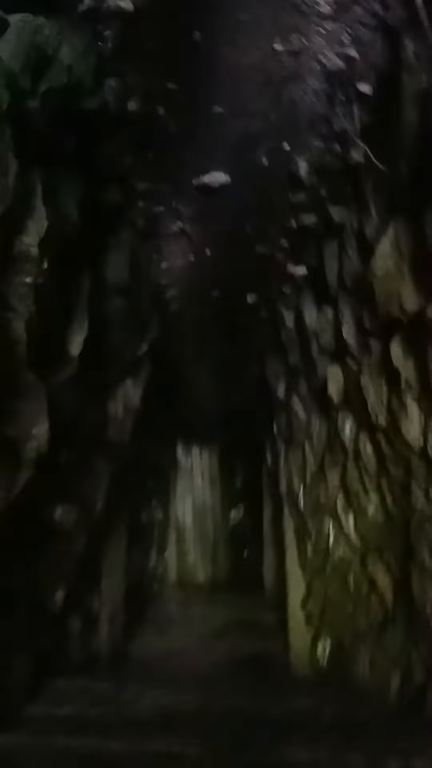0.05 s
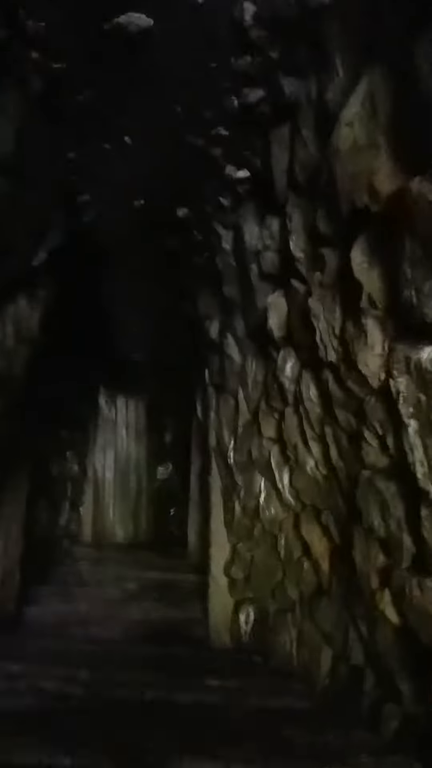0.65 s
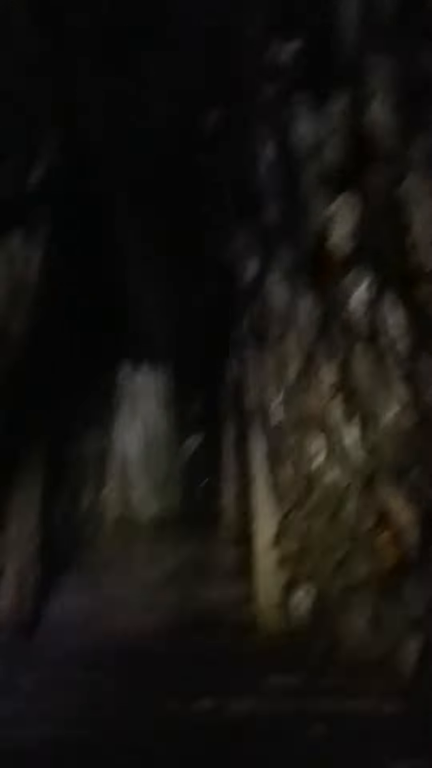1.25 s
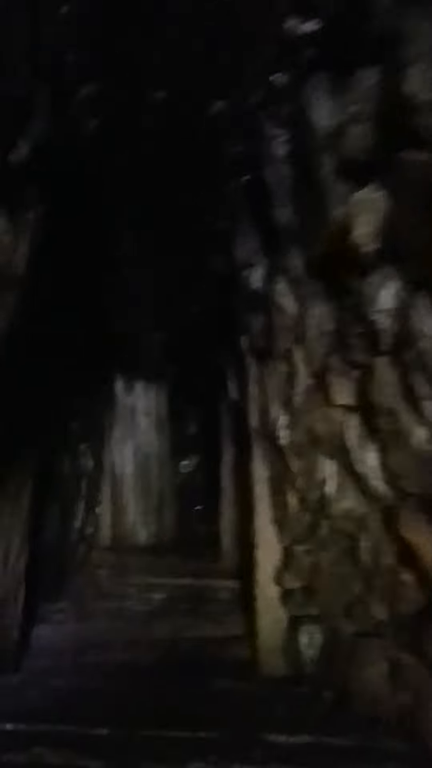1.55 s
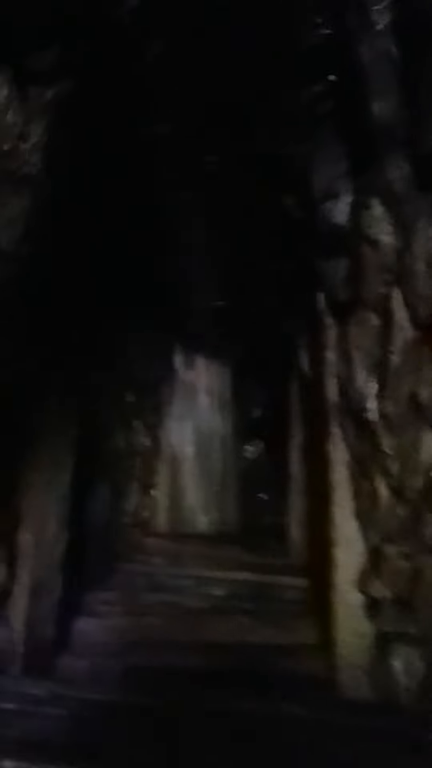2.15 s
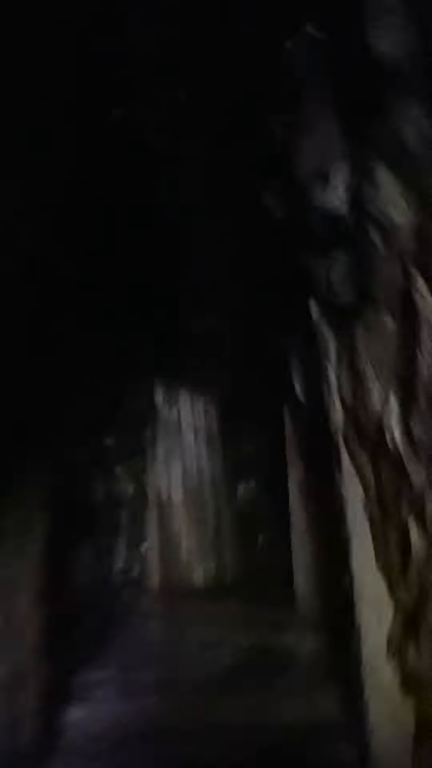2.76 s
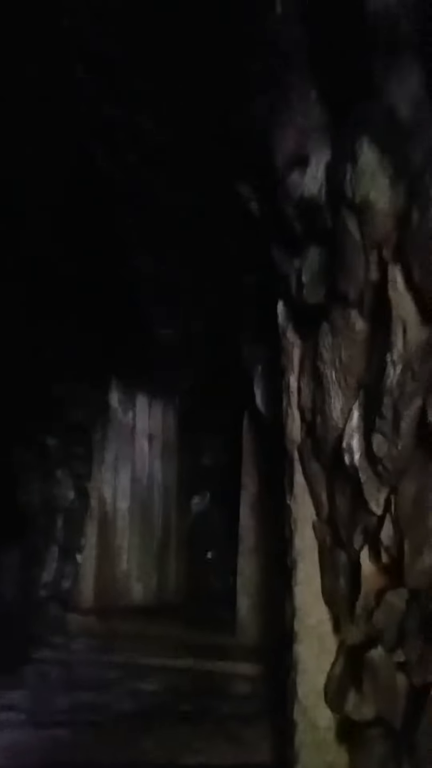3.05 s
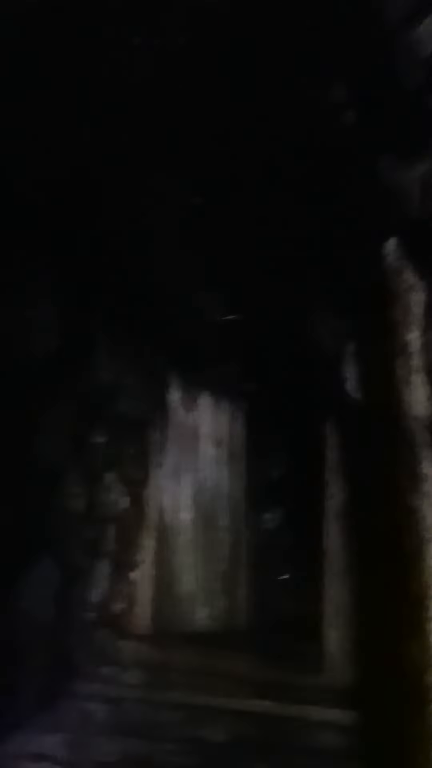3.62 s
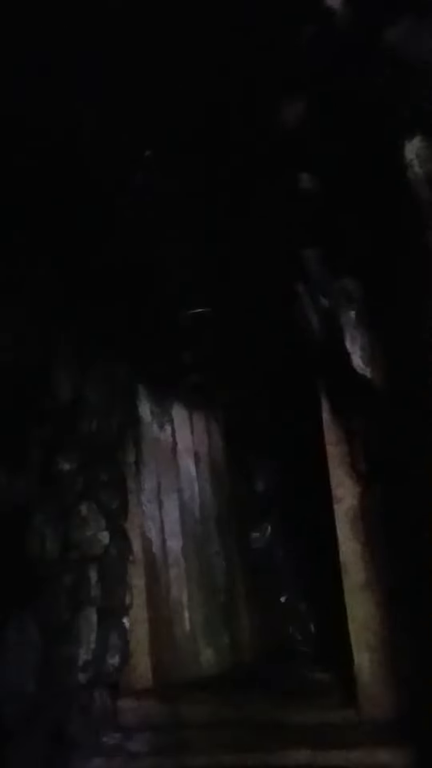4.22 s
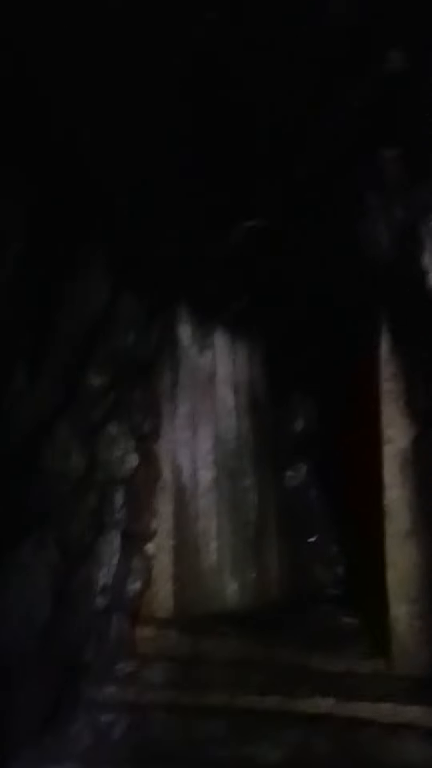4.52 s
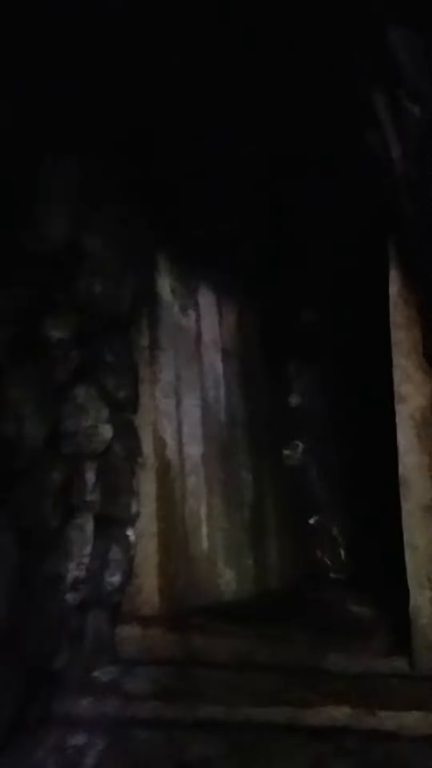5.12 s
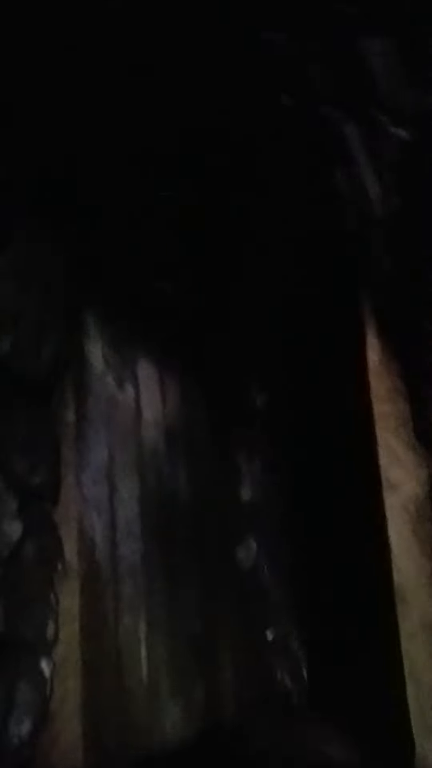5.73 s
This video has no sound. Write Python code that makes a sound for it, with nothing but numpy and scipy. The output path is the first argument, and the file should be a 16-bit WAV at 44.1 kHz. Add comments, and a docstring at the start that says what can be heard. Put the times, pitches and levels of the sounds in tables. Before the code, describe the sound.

Eight slow footsteps move through a narrow, wet rock tunnel, heard close from a stereo microphone in the walker's hand. Heels land at about 0.3, 1.1, 1.7, 2.4, 3.1, 3.8, 4.5 and 5.2 seconds. Each gives a dull thud, then the sole rubs over grit and slaps into shallow water with a fine spatter. The sharpest slaps come at about 0.5, 1.8 and 4.6 seconds, the last being the splashiest. Harder knocks sound underfoot near 0.4, 2.6 and 3.2 seconds. Loose stones and drops tick between steps, with a small cluster around 3.9 seconds, and the free foot brushes the floor faintly. Carried gear bumps softly beside the microphone, mostly between 3 and 5.2 seconds. The close walls give the steps a short, tight echo. A faint wash of distant water and a thin high hiss continue throughout, slightly left, the water swelling a little after 4 seconds.

```python
"""A narrow rock tunnel with a wet floor: eight slow steps, the stereo microphone in the walker's hand.
Each heel thuds, the sole rubs over grit and slaps down into a film of water that spatters.
Loose stones and drops tick, and carried gear bumps softly right by the microphone.
The close walls answer every contact; behind it all, a faint wash of far water and a thin high hiss."""
import sys
import numpy as np
from scipy import signal
from scipy.fft import rfft, irfft, next_fast_len
from scipy.io import wavfile
from scipy.ndimage import uniform_filter1d, map_coordinates

SR = 44100
rng = np.random.default_rng(int(sys.argv[2]) if len(sys.argv) > 2 else 0)


def materialize(psi):
    """Save the field psi as 16-bit PCM at rate SR to the path in sys.argv[1].

    A 1-D psi becomes a single channel; in a 2-D psi each row is a channel.
    """
    bounded = np.clip(np.atleast_2d(psi).T, -1, 1)
    quanta = np.round(bounded * 32767).astype(np.int16)
    wavfile.write(sys.argv[1], SR, quanta)


N = 254898
AGE = np.arange(SR // 2) / SR  # time since a contact, up to the end of its echo [s]
MIC_LAG_S = 0.00044  # the right channel trails the left

# Events. Levels are relative: each source adds its own trim.
# heel landings: (time [s], thud [dB], change per further contact [dB], hardness [dB],
# hollow ring [Hz], spatter [dB], rub [dB])
HEEL_LANDINGS = [(0.314, -33, -3.5, -7.5, 425, -44.5, -39.5), (1.058, -48.5, 3, -2.5, 406, -38, -45),
                 (1.732, -42.5, 0.5, -23, 482, -33.5, -52), (2.426, -50, -2.5, 1, 410, -44, -47.5),
                 (3.128, -39.5, -2, -4, 434, -46, -48), (3.782, -45, 0, 2, 470, -43.5, -50),
                 (4.522, -47, -1.5, 0, 500, -32.5, -47.5), (5.217, -43, 0, 0, 437, -37, -45)]
# sole landings: (time [s], slap [dB], pocket ring [Hz], ring level [dB], wet smack [dB], toe delay [s],
# spatter [dB], spatter decay [s], drag [dB], drag length [s])
SOLE_LANDINGS = [(0.4924, -21, 2400, -10, -16, 0.005, -27, 0.0043, -51, .08),
                 (1.15, -36, 2100, -9, -17, 0.014, -34.5, 0.032, -46, 0.14),
                 (1.8265, -21, 2250, 0, -7.5, 0.04, -30.5, 0.0064, -52.5, 0.18),
                 (2.584, -28.5, 2600, -25, -7, 0.023, -35, 0.022, -58.5, 0.3),
                 (3.179, -47, 2060, 0, -10, 0.026, -35.5, 0.0056, -49, 0.19),
                 (3.817, -52, 2300, -14, 4, 0.037, -35.5, 0.0079, -50.5, 0.35),
                 (4.6021, -17.5, 1820, -0.5, -4, .016, -20, 0.0042, -60.5, 0.51),
                 (5.303, -29, 2390, 1, -3, 0.027, -28.5, 0.023, -46, 0.24)]
# hard knocks underfoot: (time [s], level [dB], hardness [dB], ring [Hz], settling time [s])
GROUND_KNOCKS = [(0.365, -30, 10.5, 580, .007), (2.5651, -29, 7, 1000, 0.0028),
                 (3.15, -34.5, 3.5, 525, 0.012), (3.296, -35.5, 4, 880, 0.0099)]
# stray splashes off the shoes: (time [s], level [dB])
STRAY_SPLASHES = [(0.462, -40.5), (0.99, -50), (1.536, -52.5), (1.59, -51), (2.37, -56), (3.151, -35.5),
                  (3.925, -45), (4.5531, -30.5), (4.7435, -40), (4.8923, -48)]
# wet ticks of loose stones and drops: (time [s], level [dB], ring [Hz])
WET_TICKS = [(0.772, -43, 1580), (0.9904, -39.5, 1690), (1.1802, -31.5, 2130), (1.9248, -36, 2330),
             (3.2388, -31, 2090), (3.86, -33, 1540), (3.902, -35, 2470), (3.9683, -31, 1680),
             (4.8374, -36.5, 2150)]
# gear bumping by the microphone: (time [s], level [dB], hardness [dB], ring [Hz])
GEAR_BUMPS = [(0.682, -43.5, -7, 435), (2.454, -35.5, -9, 404), (3.21, -38, -3, 756),
              (3.406, -39, -10, 380), (4.039, -38, 3.5, 345), (4.167, -34, 4.5, 350), (4.579, -30, 6, 450),
              (4.99, -43, -2, 537), (5.178, -39.5, -5, 430)]
# the free foot brushing the floor: (time [s], length [s], level [dB])
FOOT_BRUSHES = [(0.664, 0.24, -61.5), (3.381, 0.21, -60.5), (4.384, 0.18, -52), (4.983, 0.31, -58),
                (5.665, 0.11, -61)]
# swell of the far water: (time [s], level [dB])
WASH_LEVELS = [(0, -58.5), (1.5, -59), (3, -60), (4.3, -56), (5.1, -55), (5.78, -56)]
# drift of the top-treble fizz: (time [s], level [dB])
FIZZ_LEVELS = [(0.0, -64.5), (2.59, -63.5), (2.83, -67.5), (4.43, -63.5), (4.59, -60.5), (5.78, -64.5)]

# Spectra of the sources: (frequency [Hz], level [dB])
RUBBER_SPECTRUM = [(40, -30), (100, -23.5), (170, -12), (240, -12), (400, -0.5), (620, 1), (950, -1),
                   (1500, -10.5), (3000, -41), (8000, -64)]  # dull rubber on rock
KNOCK_SPECTRUM = [(100, -51), (400, -9.5), (750, 3.5), (1200, 1.5), (1700, -1), (2350, -5.5), (3000, -17),
                  (5000, -18), (12000, -29)]  # a hard contact
CLAP_SPECTRUM = [(40, -55), (120, -60), (250, -10.5), (420, -10.5), (750, -6.5), (1200, -4), (1900, -3.5),
                 (2900, 5), (4500, -4), (6500, -12.5), (9000, -11), (16000, -46)]  # the sole closing on water
SMACK_SPECTRUM = [(60, -45), (500, -28), (2000, -1.5), (3300, -4), (4500, -2.5), (6000, -3.5), (8500, -2),
                  (16000, -35)]  # a wetter spot
SPRAY_SPECTRUM = [(40, -30), (150, -13), (300, -9), (1500, -6.5), (3000, 3.5), (4500, 3), (6500, 1),
                  (8000, 1.5), (9700, -0.5), (13000, 4), (16000, -1.5)]  # fine droplets and sand
GRIT_SPECTRUM = [(150, -23.5), (600, -9), (1100, 2), (1700, -3), (2450, -2.5), (3300, -5.5), (6000, -11.5),
                 (10000, -15), (16000, -14)]  # grit underfoot
WASH_SPECTRUM = [(20, -25), (40, -10), (90, -18.5), (160, -14), (285, -10), (450, -5.5), (750, -7),
                 (1400, -8.5), (2400, -9), (3500, -12.5), (5000, -17), (8000, -11.5), (16000, -72)]  # far water
HISS_SPECTRUM = [(2500, -25), (4500, -15.5), (5800, -11.5), (6900, -4), (7800, 2), (8500, -1), (9300, -15),
                 (10500, -26), (15800, -34)]  # narrow hiss near 8 kHz
FIZZ_SPECTRUM = [(2000, -42), (6000, 0.5), (10000, 0), (16000, -0.5)]  # faint top treble

# reverberation down the bore: (frequency [Hz], time to fall 60 dB [s])
TUNNEL_T60 = [(100, 0.4), (500, 0.4), (2000, 0.32), (4500, 0.36), (8000, 0.32), (15000, 0.23)]
# likeness of the tunnel's sound in the two channels: (frequency [Hz], correlation [0-1])
STEREO_LIKENESS = [(60, 0.57), (300, 1), (1200, 0.32), (2500, 0.33), (4500, 0.054), (15000, 0.026)]
# imbalance of the microphone: (frequency [Hz], left minus right [dB])
MIC_BALANCE = [(50, 3), (200, 1), (1500, 2.5), (4000, 3), (8000, 4.5), (10000, -3), (16000, 5.2)]


def heels(contacts=3, gap_s=0.021, pitch_ratio=1.05):
    """Each heel throws up water, rolls down in a few quick thuds and rubs on the floor."""
    out = np.zeros((2, N))
    for s, db, roll_db, hard_db, hollow_hz, spatter_db, rub_db in HEEL_LANDINGS:
        for k in range(contacts):
            contact = thud(db + k * roll_db, hard_db, hollow_hz * pitch_ratio ** k, settle_s=0.0064)
            add(out, s + k * gap_s, contact)
        add(out, s, spatter(spatter_db, decay_s=0.01))
        add(out, s + 0.015, scuff(rub_db, length_s=0.15, grit_db=-1.5))
    return out


def soles(toe_db_per_s=-380, toe_pitch=1.2):
    """The ball of the foot slaps, then the toe, softer the later it lands; water flies, the sole drags."""
    out = np.zeros((2, N))
    for landing in SOLE_LANDINGS:
        s, db, pocket_hz, ring_db, smack_db, toe_s, spatter_db, spatter_s, drag_db, drag_s = landing
        add(out, s, slap(db, pocket_hz, ring_db, smack_db))
        add(out, s + toe_s, slap(db + toe_db_per_s * toe_s, pocket_hz * toe_pitch, ring_db, smack_db))
        add(out, s + 0.0022, spatter(spatter_db, spatter_s))
        add(out, s + 0.015, scuff(drag_db, drag_s, grit_db=2.5))  # the weight rolls forward
    return out


def thud(db, hard_db, hollow_hz, settle_s):
    """Rubber lands on the ground with a hollow note; a harder landing knocks."""
    hollow = amp(-6) * ring(hollow_hz, fade_s=0.032)
    click = pulse(RUBBER_SPECTRUM) + amp(hard_db) * pulse(KNOCK_SPECTRUM) + hollow
    force = blow(settle_s, crumble_db=-1.5)
    return amp(db) * crest(tunnel(force, click, direct_db=-3.5, walls_db=5))


def slap(db, pocket_hz, ring_db, smack_db):
    """The sole claps shut on water; the pocket under it rings briefly, a wetter spot smacks brighter."""
    pocket = amp(ring_db - 1.5) * ring(pocket_hz, fade_s=0.003)
    click = pulse(CLAP_SPECTRUM) + pocket + amp(smack_db + 3) * pulse(SMACK_SPECTRUM)
    force = blow(settle_s=0.005, crumble_db=6)
    return amp(db - 2.5) * crest(tunnel(force, click, direct_db=0, walls_db=7))


def spatter(db, decay_s):
    """A shower of fine droplets and sand is thrown up within a few milliseconds and dies away."""
    shower = (1 - np.exp(-AGE / 0.0011)) * np.exp(-AGE / decay_s)
    drops = grains(shower, per_s=2000, spread_db=2.5)
    return amp(db - 2.5) * crest(tunnel(drops, pulse(SPRAY_SPECTRUM), direct_db=-5, walls_db=2))


def scuff(db, length_s, grit_db):
    """The sole slips in small jerks that swell quickly and fade: dull rubber and brighter grit."""
    stroke = np.sin(np.pi * np.clip(AGE / length_s, 0, 1) ** 0.44)
    jerks = grains(stroke, per_s=500, spread_db=3)
    rubber = tunnel(jerks, pulse(RUBBER_SPECTRUM), direct_db=5, walls_db=7.5)
    scratches = grains(stroke, per_s=700, spread_db=3.5)
    grit = tunnel(scratches, pulse(GRIT_SPECTRUM), direct_db=-2, walls_db=6.5)
    return amp(db + 2) * (crest(rubber) + amp(grit_db) * crest(grit))


def knocks():
    """Now and then the shoe meets something hard."""
    out = np.zeros((2, N))
    for s, db, hard_db, hollow_hz, settle_s in GROUND_KNOCKS:
        add(out, s, thud(db, hard_db, hollow_hz, settle_s))
    return out


def splashes():
    """Water flicks off the shoes."""
    out = np.zeros((2, N))
    for s, db in STRAY_SPLASHES:
        add(out, s, spatter(db, decay_s=0.0071))
    return out


def ticks(faint_count=8, faint_db=-49, faint_hz=2400):
    """Loose stones and drops tick, each a brief note with a gritty edge; fainter ones fall at random."""
    out = np.zeros((2, N))
    faint = [((k + when) * N / SR / faint_count, faint_db + 4 * (size - 0.5), faint_hz * 2 ** (note - 0.5))
             for k, (when, size, note) in enumerate(rng.random((faint_count, 3)))]
    for s, db, hz in WET_TICKS + faint:
        click = ring(hz, fade_s=0.005) + amp(-2) * pulse(GRIT_SPECTRUM)
        tick = tunnel(blow(settle_s=0.0017, crumble_db=-5), click, direct_db=-1, walls_db=6)
        add(out, s, amp(db - 6.5) * crest(tick))
    return out


def gear():
    """Carried gear knocks close to the microphone, so it is nearly dry."""
    out = np.zeros((2, N))
    for s, db, hard_db, body_hz in GEAR_BUMPS:
        body = amp(-3) * ring(body_hz, fade_s=0.014)
        click = pulse(RUBBER_SPECTRUM) + amp(hard_db) * pulse(KNOCK_SPECTRUM) + body
        bump = tunnel(blow(settle_s=0.004, crumble_db=-4), click, direct_db=8, walls_db=6)
        add(out, s, amp(db - 4.5) * crest(bump))
    return out


def brushes():
    """The free foot brushes over grit between steps."""
    out = np.zeros((2, N))
    for s, length_s, db in FOOT_BRUSHES:
        add(out, s, scuff(db, length_s, grit_db=5.5))
    return out


def tunnel(force, click, direct_db, walls_db):
    """One contact heard from the hand: direct sound, echoes off the close walls, a tail down the bore."""
    hz, t, bands = signal.stft(tunnel_noise(len(AGE)), SR, nperseg=256)
    decay = amp(-60 * t / along(TUNNEL_T60, hz)[:, None])
    tail = signal.istft(bands * decay, SR, nperseg=256)[1][:, :len(AGE)]
    walls = tunnel_noise(len(AGE)) * amp(walls_db - 60 * AGE / 0.084)
    room = (tail + walls) * (1 - np.exp(-AGE / 0.0011))
    room /= np.linalg.norm(room[0])
    # the hand shades the straight path above 3500 Hz, so most treble arrives by way of the walls
    shaded = np.exp(-2 * np.pi * 3500 * AGE)
    direct = amp(direct_db) * shaded / shaded.sum()
    room += np.array([direct, np.roll(direct, round(MIC_LAG_S * SR))])
    source = signal.fftconvolve(force, click)[:len(AGE)]
    return signal.fftconvolve(room, source[None], axes=1)[:, :len(AGE)]


def far_water(flutter_per_s=14):
    """Water washes far down the tunnel, its level slightly restless."""
    t = np.arange(N) / SR
    flutter = map_coordinates(rng.standard_normal(N // SR * 40), [t * flutter_per_s], mode="mirror")
    level_db = np.interp(t, *np.transpose(WASH_LEVELS)) + 0.75 * flutter
    return coloured(tunnel_noise(N), WASH_SPECTRUM) * amp(level_db + 0.5)


def ambience(hiss_db=-48.5, hiss_db_per_s=-0.55):
    """Far water and a thin hiss that fades as the walker moves on, both a little left; a faint fizz."""
    t = np.arange(N) / SR
    wash = far_water()
    hiss = coloured(rng.standard_normal((2, N)), HISS_SPECTRUM) * amp(hiss_db + hiss_db_per_s * t)
    fizz_db = np.interp(t, *np.transpose(FIZZ_LEVELS)) + 6.5
    fizz = coloured(rng.standard_normal((2, N)), FIZZ_SPECTRUM) * amp(fizz_db)
    return (wash + hiss) * amp([[0.5], [-0.5]]) + fizz


def tunnel_noise(n):
    """Noise along the tunnel: it meets the microphone's left side first; the treble is unrelated."""
    def blend(hz):
        turn = np.arccos(np.clip(along(STEREO_LIKENESS, hz), -1, 1)) / 2
        return np.array([np.cos(turn), np.sin(turn)])
    mid, side = filtered(rng.standard_normal((2, n)), blend)
    return np.array([mid + side, np.roll(mid - side, round(MIC_LAG_S * SR))])


def blow(settle_s, crumble_db):
    """One push followed by a crumble of small contacts as things settle."""
    force = amp(crumble_db) * grains(np.exp(-AGE / settle_s), per_s=3000, spread_db=-1.5)
    force[0] += 1
    return force


def grains(envelope, per_s, spread_db):
    """Tiny contacts of uneven size under an envelope, energy 1."""
    n = len(envelope)
    hits = (rng.random(n) < per_s / SR) * rng.choice([-1, 1], n)
    force = hits * amp(spread_db * rng.standard_normal(n)) * envelope
    return force / (np.linalg.norm(force) + 1e-20)


def ring(hz, fade_s, size=2048):
    """A damped resonance with a soft start, energy 1."""
    t = AGE[:size]
    wave = t * np.sin(2 * np.pi * hz * t) * amp(-60 * t / fade_s)
    return wave / np.linalg.norm(wave)


def pulse(spectrum, size=2048):
    """The shortest causal click with this spectrum, energy 1."""
    gain = amp(along(spectrum, np.fft.rfftfreq(size, 1 / SR)))
    cepstrum = irfft(np.log(gain))
    cepstrum[1:size // 2] *= 2
    cepstrum[size // 2 + 1:] = 0
    click = irfft(np.exp(rfft(cepstrum)))
    return click / np.linalg.norm(click)


def coloured(noise, spectrum):
    """Noise shaped by a spectrum, rms 1."""
    x = filtered(noise, lambda hz: amp(along(spectrum, hz)))
    return x / np.sqrt(np.mean(x ** 2) + 1e-20)


def filtered(x, response):
    """x through a frequency response."""
    n = x.shape[-1]
    padded = next_fast_len(n + SR // 10)
    return irfft(rfft(x, padded) * response(np.fft.rfftfreq(padded, 1 / SR)), padded)[..., :n]


def along(points, hz):
    """Read (frequency [Hz], value) points on a log axis."""
    frequencies, values = np.transpose(points)
    return np.interp(np.log(hz + 1), np.log(frequencies + 1), values)


def crest(x):
    """x with its loudest 4 ms at rms 1."""
    power = uniform_filter1d(np.mean(x ** 2, axis=0), size=176)
    return x / np.sqrt(power.max() + 1e-20)


def amp(db):
    """Decibels to gain."""
    return 10 ** (np.asarray(db) / 20)


def add(track, s, sound):
    """Mix a sound in at time s."""
    part = track[:, round(s * SR):][:, :sound.shape[1]]
    part += sound[:, :part.shape[1]]


def scene():
    """The walk up close, the air of the tunnel behind it."""
    return heels() + soles() + knocks() + splashes() + ticks() + gear() + brushes() + ambience()


def record(dry):
    """The handheld microphone is mostly keener on the left; its converter has a band limit and offset."""
    top_hz, dc_offset = 16000, -0.0006
    heard = filtered(dry, lambda hz: amp(np.outer([0.5, -0.5], along(MIC_BALANCE, hz))))
    return filtered(heard, lambda hz: hz < top_hz) + dc_offset


dry = scene()
out = record(dry)
materialize(out)
```